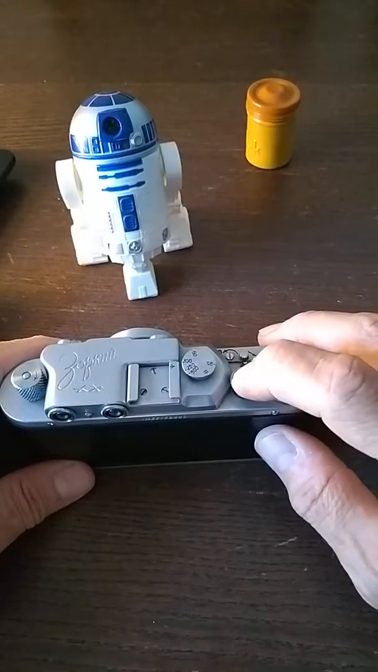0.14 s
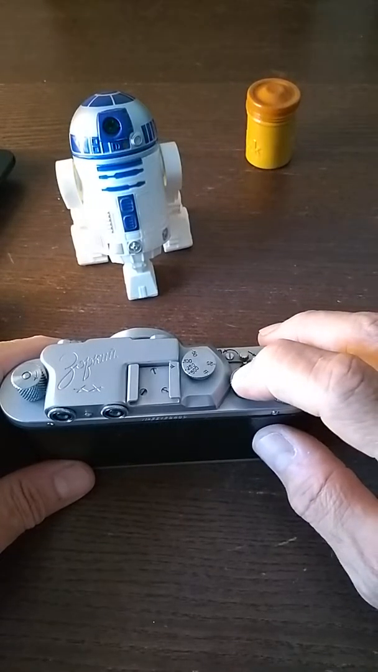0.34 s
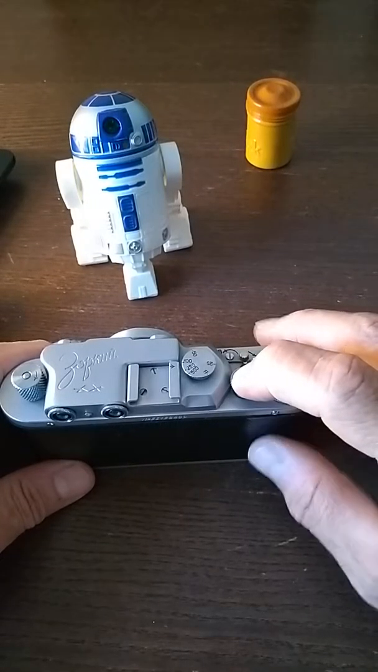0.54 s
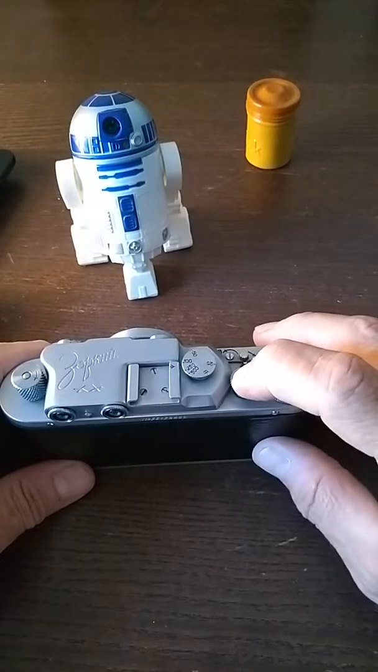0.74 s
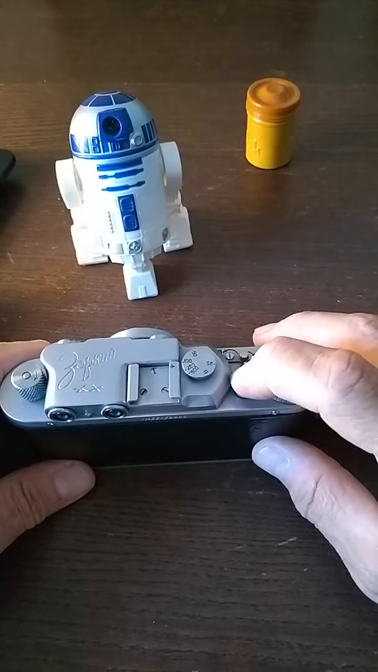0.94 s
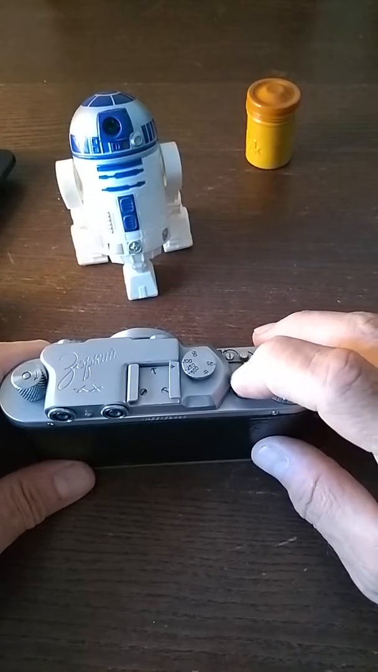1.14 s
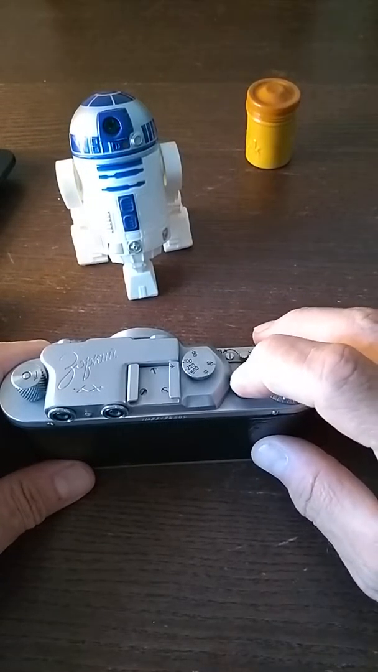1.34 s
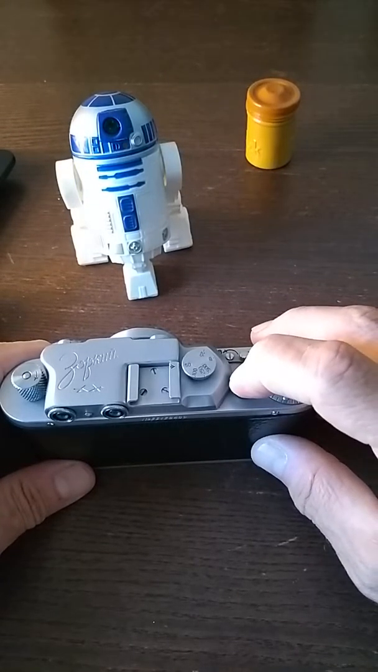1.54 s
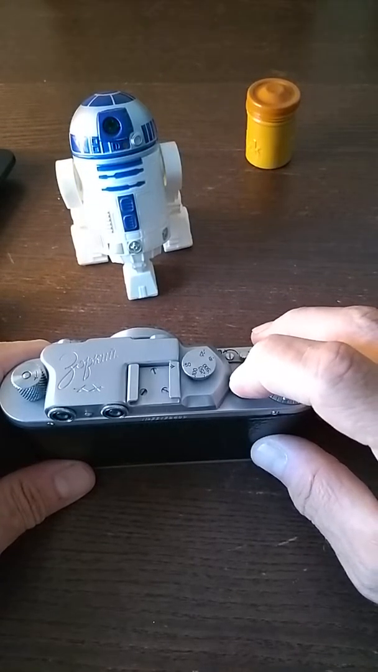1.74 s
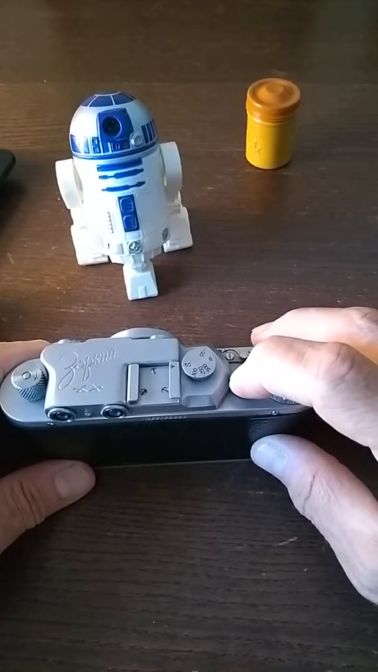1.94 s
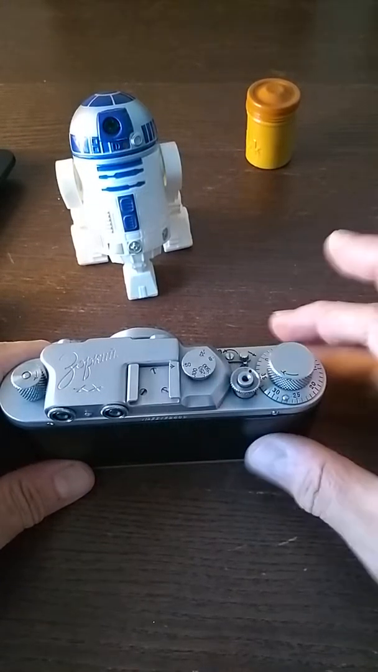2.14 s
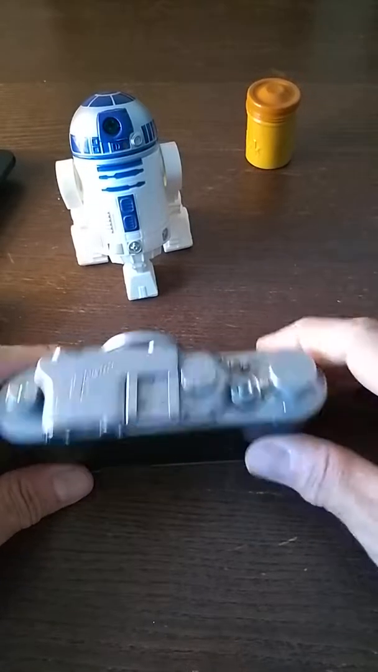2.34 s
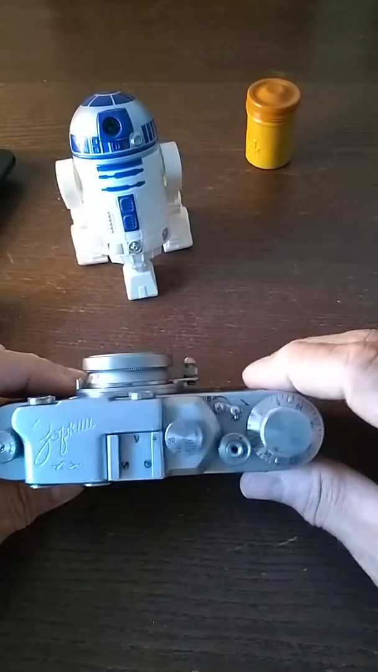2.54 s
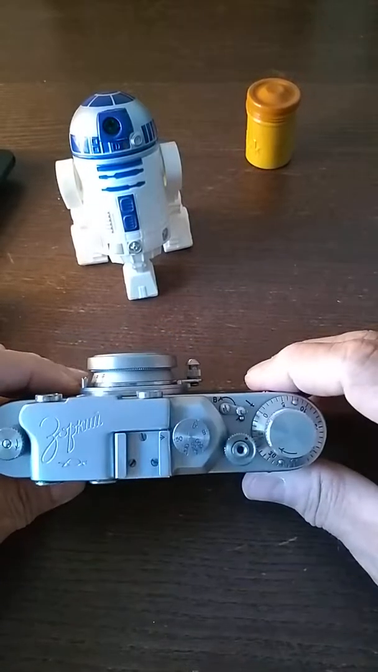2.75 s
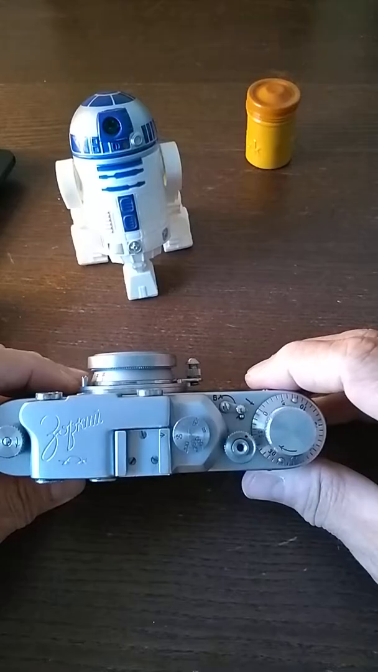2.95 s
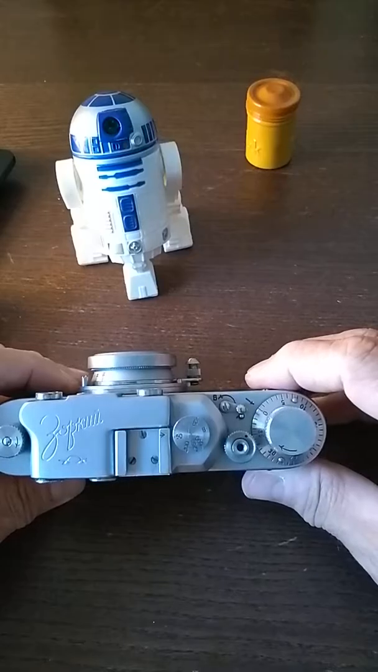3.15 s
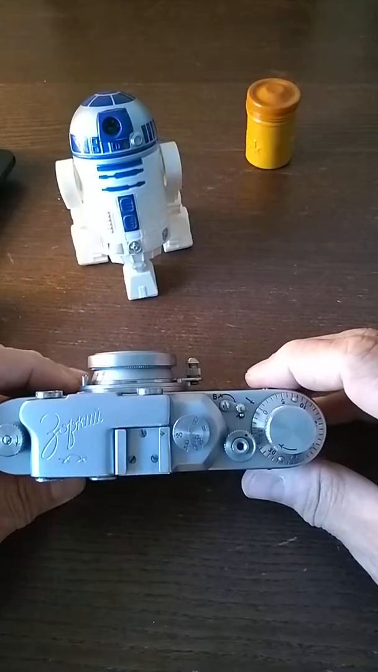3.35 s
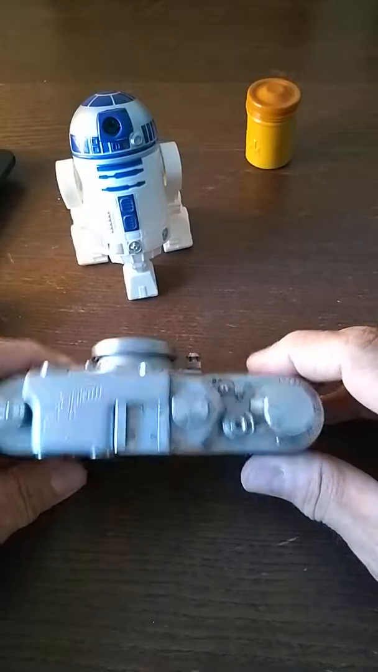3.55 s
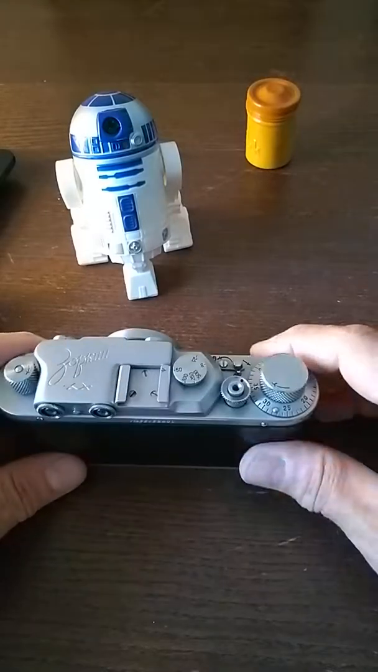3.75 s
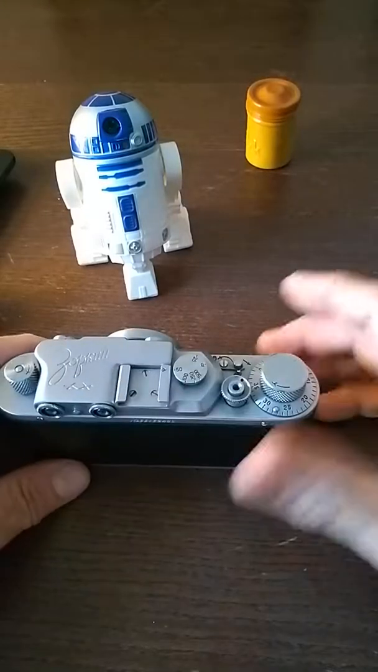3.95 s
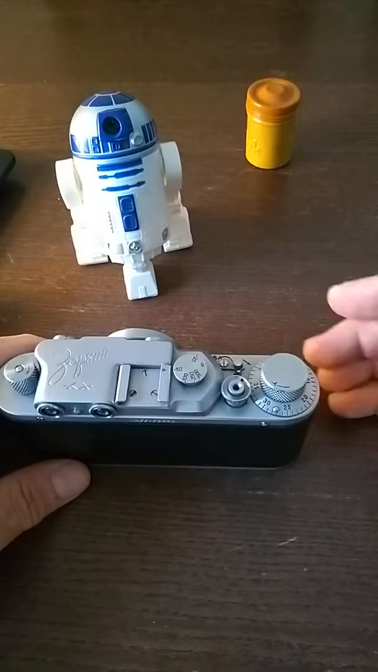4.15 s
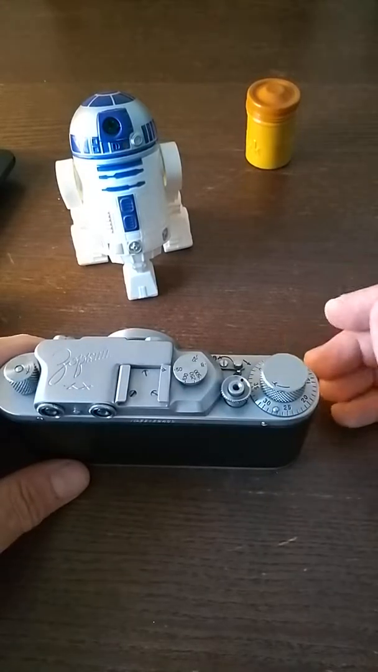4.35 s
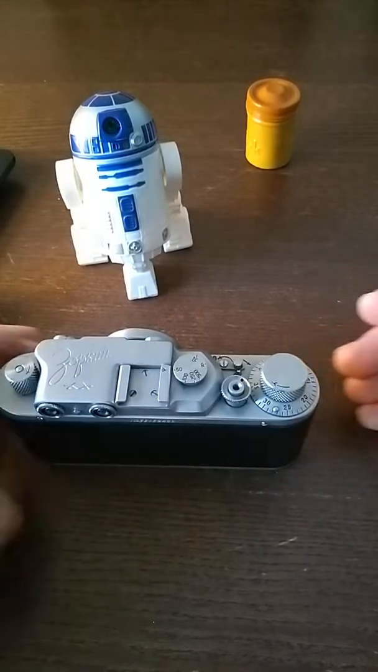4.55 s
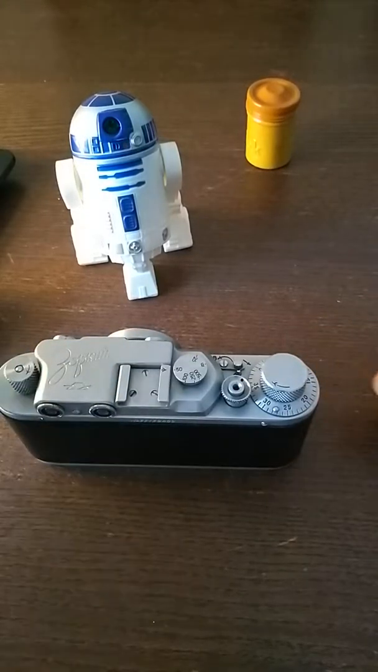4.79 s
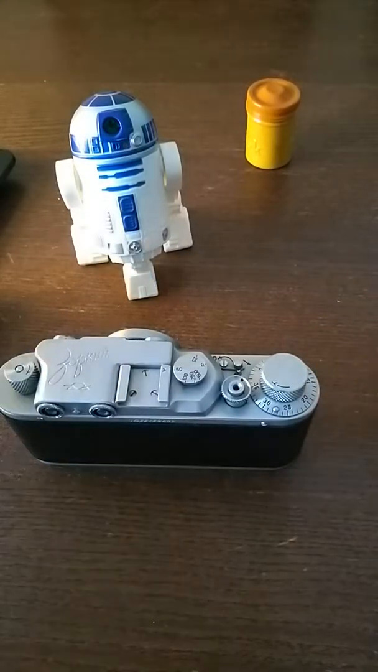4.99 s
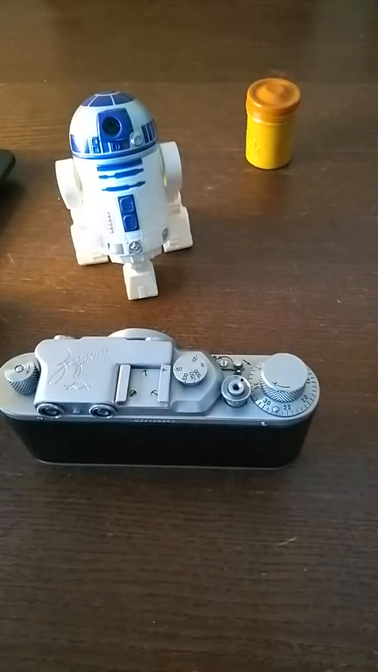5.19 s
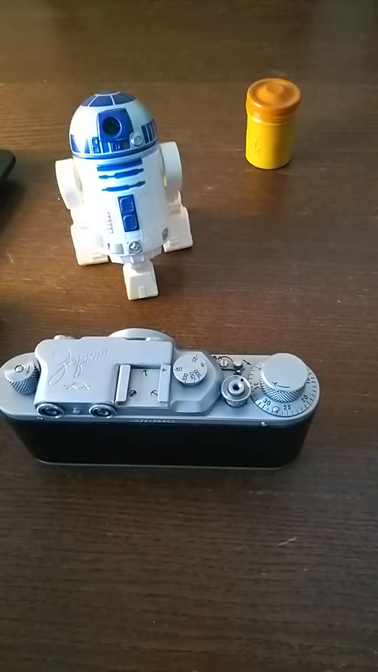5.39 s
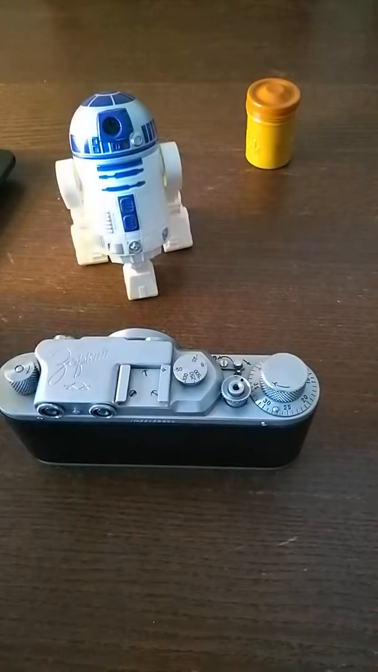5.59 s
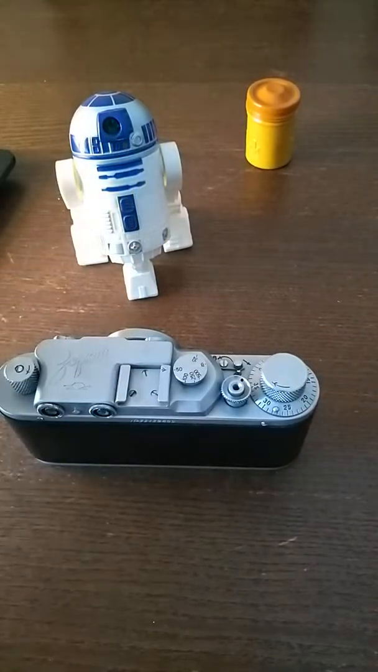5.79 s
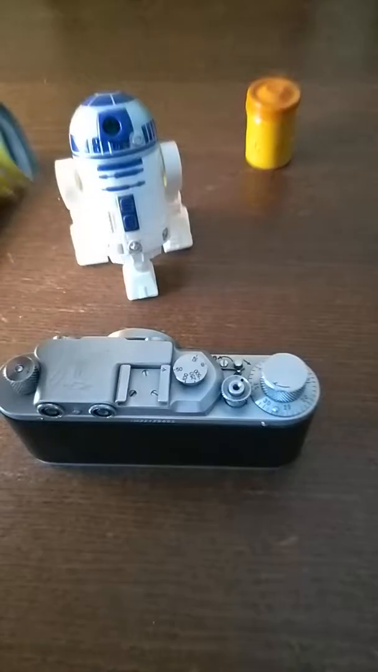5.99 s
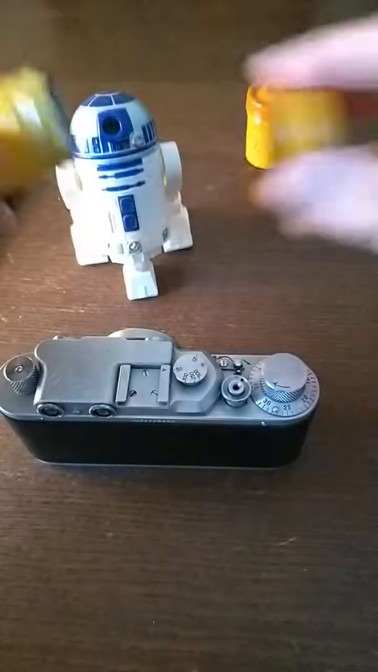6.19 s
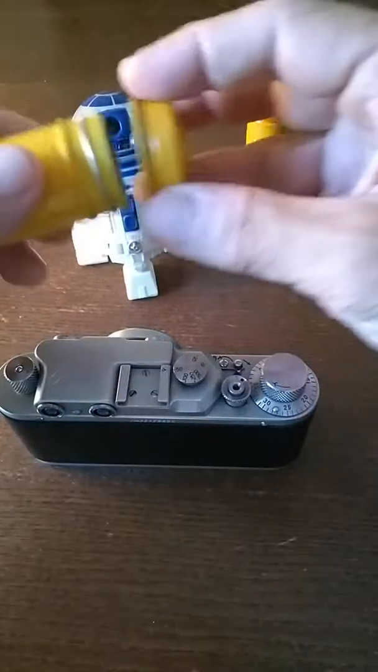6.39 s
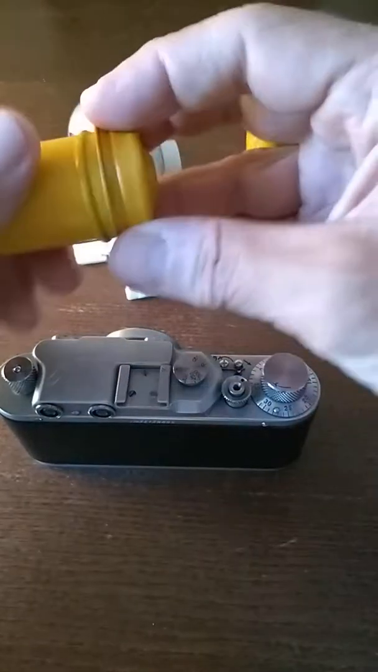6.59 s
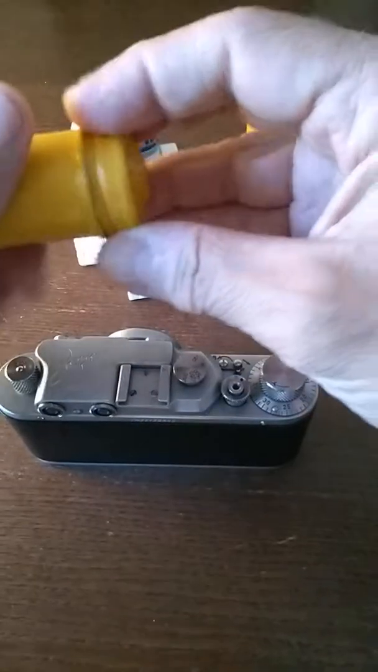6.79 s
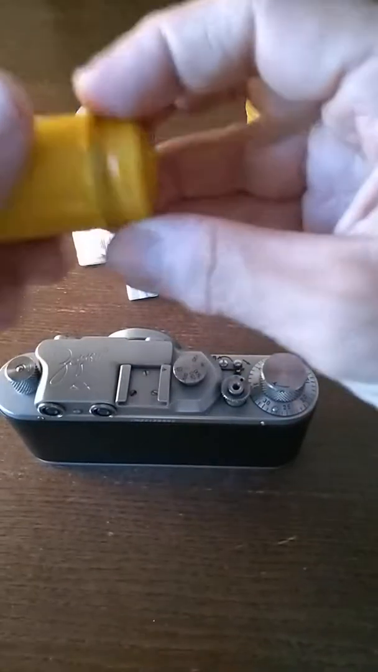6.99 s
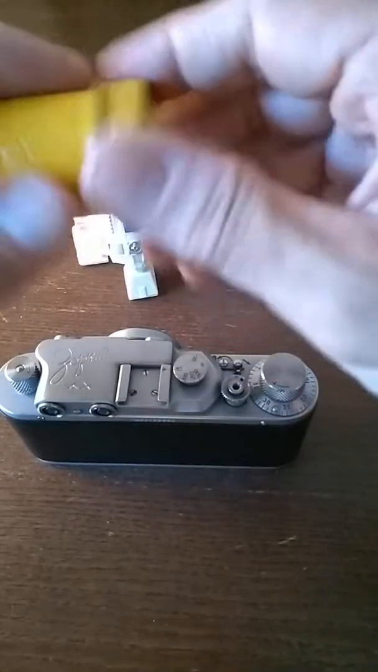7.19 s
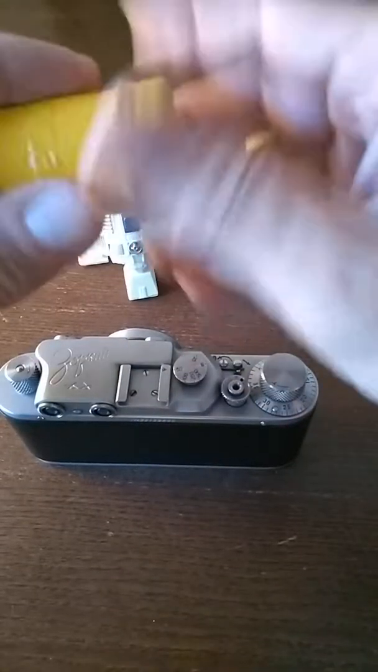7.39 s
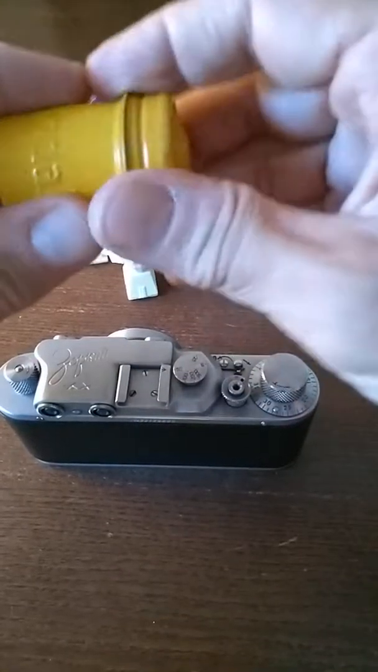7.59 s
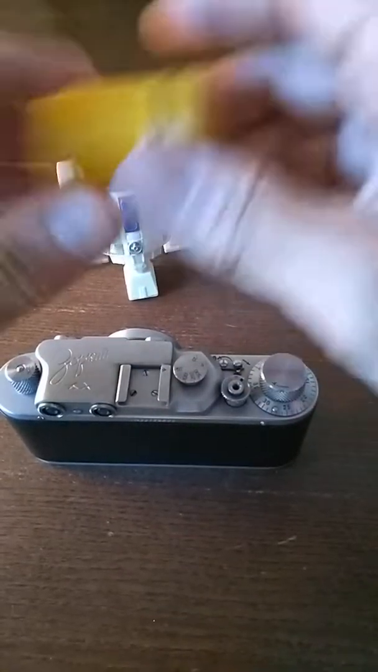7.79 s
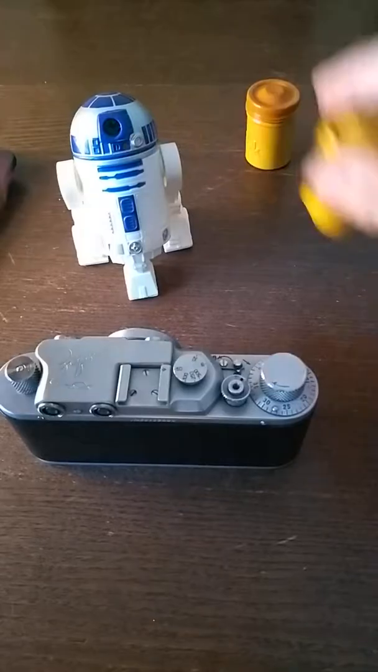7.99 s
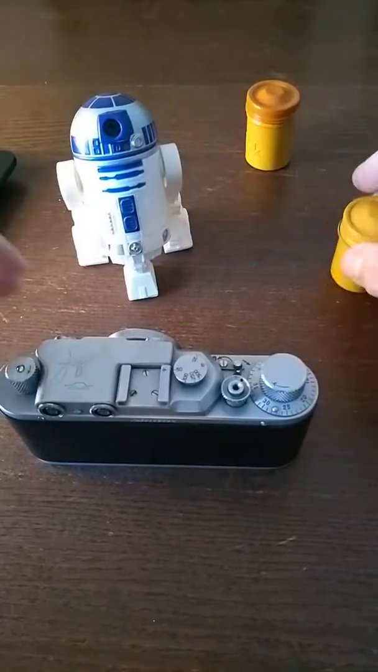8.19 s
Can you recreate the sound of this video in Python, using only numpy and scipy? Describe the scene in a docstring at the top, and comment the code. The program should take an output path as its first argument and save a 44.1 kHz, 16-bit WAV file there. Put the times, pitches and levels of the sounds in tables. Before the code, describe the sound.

A crisp shutter clack from an old metal camera comes first, heard up close over a faint room rumble. Fingers tick against the body, which slides and bumps gently on a wooden table. After a short pause, hands gather a little metal can, knock its lid on and twist it closed in tiny gritty scrapes with light, high tinkles. Finally the can is put down with a hard, rattling tap.

```python
"""Film camera and small can

A metal camera on a wooden table fires its shutter, a finger leaves the release, and the body is tipped
up and set back. Then a small metal can is picked up, its lid is knocked on and screwed shut, and it is
set down. Each touch is a tiny rattle that rings the metal; the heavier bumps also ring the table.
A phone in the quiet room mixes its two microphone openings, which cancels some pitches."""
import sys
import numpy as np
from scipy import signal
from scipy.fft import rfft, irfft, next_fast_len
from scipy.io import wavfile
from scipy.ndimage import map_coordinates

SR = 44100
rng = np.random.default_rng(int(sys.argv[2]) if len(sys.argv) > 2 else 0)


def materialize(psi):
    """Save the field psi as 16-bit PCM at rate SR to the path in sys.argv[1].

    A 1-D psi becomes a single channel; in a 2-D psi each row is a channel.
    """
    bounded = np.clip(np.atleast_2d(psi).T, -1, 1)
    quanta = np.round(bounded * 32767).astype(np.int16)
    wavfile.write(sys.argv[1], SR, quanta)


N = 362943
CONTACT_TIME_S = np.arange(2 ** 13) / SR  # the clock within one touch

# A touch has a sharp crack, a high sparkle and a pitched knock. Sparkle and knock levels count from
# the crack's level. A decay is the time taken to fade by 60 dB.
# Shutter parts catch and stop: start_s, crack_db, sparkle_db, knock_hz, knock_db, decay_s
SHUTTER_CLICKS = [(1.473, -43, -27, 700, -4, 0.056), (1.4935, -15.5, -9, 820, -5, 0.072),
                  (1.503, -28, -16, 480, 9, 0.024), (1.5105, -10.5, -28, 488, -8.5, .035),
                  (1.521, -16, -11, 498, -1.5, .06), (1.532, -18.5, -20, 960, -4.5, 0.063),
                  (1.5399, -7.5, -24, 930, -12, 0.046), (1.553, -9.5, -25, 930, -15, 0.019)]
# Fingers and table touch the camera: start_s, crack_db, sparkle_db, knock_hz, knock_db, decay_s
CAMERA_TOUCHES = [(1.8926, -21, -8.5, 1110, -10.5, 0.043), (1.9107, -27, -8.5, 584, -7, 0.1),
                  (2.0092, -15, -28, 1900, -6.5, 0.04), (2.0279, -17, -14, 1130, -4, .022),
                  (2.0339, -31.5, -8, 1820, 7.5, 0.081), (2.356, -36, -18, 478, -10, .02),
                  (2.367, -39, -20, 603, -6, .02), (2.376, -33, -18, 748, -6, .02),
                  (2.388, -23, -30, 386, -25, 0.028), (2.3964, -29, -20, 590, -1, .03),
                  (2.6468, -38, -29, 1630, 16, 0.015), (3.599, -43, -30, 1950, 3.5, 0.31),
                  (3.69, -24.5, -38, 635, 13.5, 0.0074), (3.7059, -52, -21, 390, 25, 0.04),
                  (3.9816, -28.5, -16, 523, -8, .07), (4.0658, -33, -17, 401, -6, 0.037),
                  (4.077, -41, -15, 417, 3, 0.027), (4.1385, -31.5, -34, 610, -6, 0.018),
                  (4.4748, -49, -3, 493, -10, .03), (4.559, -33.5, -13, 526, -10, 0.03),
                  (4.7313, -45, 2, 420, 1, 0.038)]
# A hand gathers can and lid: start_s, crack_db, sparkle_db, knock_hz, knock_db
CAN_GRABS = [(5.3673, -20, -5, 1430, 3), (5.8094, -43, -14, 640, 7), (5.8672, -48.5, -10, 1490, 12.5),
             (5.976, -26, -2.5, 1630, -1), (6.0377, -43.5, 10, 740, 8), (6.046, -39.5, -18, 840, 20.5),
             (6.0671, -31.5, -12, 1060, 1)]
# The lid is knocked on and fingered: start_s, crack_db, sparkle_db, knock_hz, knock_db
LID_KNOCKS = [(6.4506, -8.5, -9.5, 1436, -2), (6.4656, -13, -16, 1270, -7), (6.5124, -30.5, -8, 1290, 12.5),
              (6.5706, -12.5, -10.5, 633, -8), (6.626, -42, -10, 548, 17), (6.6395, -40, -6, 1240, 10),
              (6.681, -46, -13, 553, 14.5), (6.7075, -39, -12, 540, 11), (6.7393, -32, -10, 1710, 3),
              (6.742, -42, -14, 638, 18.5), (6.7748, -34.5, -29, 516, 2), (6.8149, -44, -13, 1250, 10.5),
              (6.9213, -45.5, -10, 470, 11.5), (6.9592, -47, -15, 470, 12), (7.0457, -36, -9, 452, 6.5),
              (7.071, -33.5, -13, 1050, -18), (7.232, -40, -10, 1400, -4)]
# The thread scrapes as the lid turns: start_s, crack_db, sparkle_db, knock_hz, knock_db, length_s
THREAD_SCRAPES = [(6.557, -35.5, 2, 660, 11.5, 0.024), (6.622, -36.5, -3, 1225, 2, 0.026),
                  (6.812, -37, 0, 1500, -3, 0.085), (6.964, -36, -2.5, 1270, 0.5, 0.04),
                  (7.085, -37, 4, 1470, 1, 0.044), (7.134, -37.5, 7, 2260, 15, 0.041),
                  (7.192, -37, 3, 1480, -16, 0.049)]
# The loose lid tinkles: start_s, crack_db, pitch_hz
LID_TINKLES = [(5.4564, -39.5, 7850), (6.0994, -39, 9700), (6.2741, -44, 8000), (7.33, -39, 8100),
               (7.3373, -40, 9670), (7.4839, -30, 9570), (7.505, -41, 8050), (7.605, -37.5, 7960),
               (7.626, -51, 8300), (7.7877, -45, 8800), (7.84, -49, 5960), (8.109, -39, 8070)]
# The closed can lands and bounces: start_s, crack_db, knock_hz, knock_db
CAN_BOUNCES = [(8.1494, -3, 453, -5.5), (8.1534, -11, 830, -1), (8.1604, -19, 654, 9.5),
               (8.1655, -24, 1014, 14), (8.177, -32.5, 1770, 12)]
# How hard each bump drives the table's notes: start_s, shove_db, low_board_db, high_board_db, top_db
TABLE_BUMPS = [(1.501, -65, -50, -44.5, -43), (2.014, -49, -49, -53, -32), (2.44, -68, -66, -41, -38),
               (2.645, -46, -42, -33, -31.5), (3.691, -55, -46, -32, -27.5),
               (5.969, -43, -28.5, -35.5, -41), (6.045, -38, -31.5, -35, -29), (8.149, -66, -62, -56, -47)]
# Sliding strokes: start_s, swell_s, hold_s, fade_s, groan_db, groan_cutoff_hz, skin_hiss_db
SLIDES = [(2.323, 0.063, 0.0045, 0.048, -52, 400, -46), (2.396, 0.064, 0.012, 0.16, -26, 340, -51),
          (3.493, 0.115, 0.06, 0.009, -38.5, 800, -52), (5.373, 0.0041, 0.0064, 0.16, -48, 900, -43.5),
          (5.8, .01, 0.13, .01, -45, 900, -60)]

# The notes each object rings with when hit: pitch_hz, decay_s, relative_db
CAMERA_NOTES = [(485, 0.034, -13), (1740, 0.055, 0), (2600, 0.03, -2), (3260, 0.037, -6), (3620, 0.015, 8),
                (3600, 0.015, -7), (5010, 0.012, 5), (5600, 0.019, 12.5), (6200, 0.0078, -13),
                (7400, 0.011, -26), (8200, 0.011, 8), (10700, 0.0092, -15), (14000, .02, -27)]
OPEN_CAN_NOTES = [(2580, 0.01, -31), (3430, 0.0084, -6.5), (5860, .025, -1), (5940, 0.018, -7),
                  (7180, 0.0087, 13), (7690, 0.042, 4), (7950, 0.022, 5.5), (10230, 0.032, -8),
                  (10900, .02, -21)]
LID_NOTES = [(5227, .06, -6), (5670, 0.052, -11), (8150, 0.062, -1), (9870, .06, -6), (10740, 0.058, -7),
             (11700, .05, -3), (12900, 0.054, -13)]
CLOSED_CAN_NOTES = [(1280, 0.025, -2), (1770, .04, -6), (2650, 0.023, -4), (3310, 0.034, 4.5),
                    (5290, 0.015, 12.5), (6440, 0.034, 5)]
TABLE_BOARD_NOTES = [(50, 0.26, 0), (96.15, 0.63, 0), (122.8, 1.0, 0.0041)]
TABLE_TOP_NOTES = [(204, 0.5, -1), (267.8, 0.09, 4), (403, 0.16, -3), (542.5, 0.23, -2), (690.5, 0.15, 0.5),
                   (891, 0.08, -1), (890, 0.17, -18.5), (1053, 0.076, 0.5)]

# How long the room echoes: pitch_hz, decay_s
ECHO_DECAY = [(100, 1), (500, 0.46), (2000, 0.53), (6000, 0.48), (14000, 0.3)]
# The tone of the room's rumble and of the hiss of skin and rustle: pitch_hz, relative_db
RUMBLE_TONE = [(20, -16.5), (90, -15), (170, -6), (230, 0.5), (370, 3.5), (600, -4), (1200, -15.5),
               (2000, -28), (3500, -46), (6000, -37)]
HISS_TONE = [(1200, 9.5), (2500, 5), (5000, 3), (8000, -2.5), (11000, -9), (13200, -66), (14200, 0.5)]
# The faint rustle rises and falls: time_s, level_db
RUSTLE_LEVELS = [(0.0, -58), (1.4, -56.5), (3.4, -56.5), (4.3, -55.5), (4.65, -52.5), (5.45, -53.5),
                 (6.67, -49), (6.83, -55.5), (7.15, -49), (7.31, -56), (8.23, -54.5)]

# How far the second microphone opening lags: pitch_hz, left_cycles, right_cycles
OPENING_LAG = [(0, 0, 0), (2240, 1, 1), (3400, 1.5, 1.52), (4478, 1.87, 2), (6632, 2.7, 3), (8785, 3.52, 4),
               (11000, 4.3, 5), (15400, 5.8, 7)]
# How much of that late sound is mixed in: pitch_hz, share
LATE_SHARE = [(500, 0.053), (2200, 0.74), (4500, 0.66), (9000, 0.48), (14000, 0)]
# How far the left channel runs ahead in the bass: pitch_hz, lead_radians
LEFT_LEAD = [(40, 1), (100, 0.86), (200, 0.39), (400, 0.22), (600, 0.15), (900, 0)]
# How much louder left is than right: pitch_hz, difference_db
LEFT_BALANCE = [(25, 5), (60, -4.5), (130, -0.5), (250, 0.8), (600, 0.63), (1200, -0.37)]


def camera():
    """Shutter parts catch and stop, then fingers and table knock against the metal body."""
    clicks = [(*row, blow(decay_s, rise_s=0.0014)) for *row, decay_s in SHUTTER_CLICKS]
    touches = [(*row, blow(decay_s, rise_s=0.00067)) for *row, decay_s in CAMERA_TOUCHES]
    shutter = strike(clicks, CAMERA_NOTES, knock_cycles=16, ring_db=-45, dullness=0.042,
                     low_hz=3020, high_hz=8000, grit_db=-1.5)
    handling = strike(touches, CAMERA_NOTES, knock_cycles=16, ring_db=-48, dullness=1.22,
                      low_hz=2700, high_hz=6460, grit_db=3.0)
    return shutter + handling


def lid_knocks():
    """The lid is knocked onto the can; harder knocks bring out more of its ring."""
    hits = [(*row, blow(decay_s=0.011, rise_s=0.00017)) for row in LID_KNOCKS]
    return strike(hits, OPEN_CAN_NOTES, knock_cycles=20, ring_db=-18, dullness=1,
                  low_hz=2120, high_hz=7140, grit_db=7.0, ring_growth=0.58)


def can_pickup():
    """Can and lid give dry clicks as a hand gathers them from the table."""
    hits = [(*row, blow(decay_s=0.025, rise_s=0.00017)) for row in CAN_GRABS]
    return strike(hits, OPEN_CAN_NOTES, knock_cycles=2.8, ring_db=-43, dullness=0.55,
                  low_hz=2170, high_hz=7160, grit_db=2.5)


def lid_screwing():
    """Each twist scrapes the thread and sounds the hollow of the can."""
    hits = [(*row, twist(length_s)) for *row, length_s in THREAD_SCRAPES]
    return strike(hits, OPEN_CAN_NOTES, knock_cycles=13, ring_db=-43, dullness=1,
                  low_hz=1800, high_hz=6700, grit_db=3.5)


def lid_tinkles(sparkle_db=-15, note_db=-7):
    """Light taps ring the loose lid, each with one high note standing out."""
    force = blow(decay_s=0.012, rise_s=0.00064)
    hits = [(start_s, db, sparkle_db, hz, note_db, force) for start_s, db, hz in LID_TINKLES]
    return strike(hits, LID_NOTES, knock_cycles=210, ring_db=-30, dullness=0,
                  low_hz=6000, high_hz=10400, grit_db=2.5)


def can_landing(sparkle_db=-30, stretch=1.8):
    """The closed can hits the table; each bounce rattles longer than the one before."""
    hits = [(start_s, db, sparkle_db, hz, knock_db, blow(decay_s=0.011 * stretch ** k, rise_s=0.00029))
            for k, (start_s, db, hz, knock_db) in enumerate(CAN_BOUNCES)]
    return strike(hits, CLOSED_CAN_NOTES, knock_cycles=14, ring_db=-38, dullness=0.99,
                  low_hz=1600, high_hz=7040, grit_db=5.5)


def strike(hits, notes, knock_cycles, ring_db, dullness, low_hz, high_hz, grit_db, ring_growth=0):
    """A rattling force makes a crack (low_hz to high_hz), a sparkle above it and a pitched knock."""
    out, size = np.zeros(N + SR), len(CONTACT_TIME_S)
    f = np.fft.rfftfreq(size, 1 / SR)
    treble = (1j * f / high_hz / (1 + 1j * f / high_hz)) ** 4 / (1 + 1j * f / 9500) ** 4
    middle = (1 - 1 / (1 + 1j * f / low_hz)) ** 3 / (1 + 1j * f / high_hz) ** 4
    for start_s, crack_db, sparkle_db, knock_hz, knock_db, force in hits:
        lumps = amp(grit_db * np.repeat(rng.standard_normal(size // 64), 64))  # the force is uneven
        rattle = rfft(force * lumps * rng.standard_normal(size))
        varied_notes = [(hz, decay_s, db + 2 * rng.normal()) for hz, decay_s, db in notes]
        metal = 1 + amp(ring_db + ring_growth * crack_db) * ringing(varied_notes, f)
        crack = metal * middle / (1 + 1j * f / low_hz) ** (2 * dullness)  # soft touches lose their edge
        knock = ringing([(knock_hz, knock_cycles / knock_hz, 0)], f)
        knock *= soften(f, 2 * knock_hz) * f / (f - 250j)  # trim treble and bass
        parts = irfft(rattle * np.array([crack, metal * treble, knock]), size)
        gains = amp(crack_db + np.array([0, sparkle_db, knock_db])) / np.abs(parts).max(axis=1)
        out[round(start_s * SR):][:size] += gains @ parts
    return out[:N]


def blow(decay_s, rise_s):
    """The force of a blow rises quickly, then dies away."""
    return amp(-60 * CONTACT_TIME_S / decay_s) * (1 - np.exp(-(CONTACT_TIME_S / rise_s) ** 2))


def twist(length_s):
    """The force of a twist swells and lets go."""
    return np.sin(np.pi * np.clip(CONTACT_TIME_S / length_s, 0, 1)) ** 2


def table_thumps():
    """Soft bumps shove the table and ring the deep notes of its board and the quicker ones of its top."""
    bumps = np.zeros((4, N))
    for start_s, *levels_db in TABLE_BUMPS:
        bumps[:, round(start_s * SR)] = amp(levels_db)

    def wood(f):
        board = [soften(f, 172) * ringing([note], f) for note in TABLE_BOARD_NOTES]
        top = amp(-9.5) * soften(f, 2700) * ringing(TABLE_TOP_NOTES, f) * f / (f - 150j)
        return np.array([*board, top])
    return filtered(bumps, wood).sum(axis=0)


def rubbing():
    """Sliding is grainy: it makes the table top groan and skin hiss on the metal."""
    wood_grain, skin_grain = rng.standard_normal((2, N)) * amp(2.8 * np.array([wobble(60), wobble(300)]))
    metal = lambda f: amp(at_pitch(HISS_TONE, f)) * (1 + amp(-52) * ringing(CAMERA_NOTES, f))
    hiss = unit(filtered(skin_grain, metal))
    out = np.zeros(N)
    for *timing, groan_db, cutoff_hz, hiss_db in SLIDES:
        wood = lambda f: ringing(TABLE_TOP_NOTES[1:], f) / (1 + 1j * f / cutoff_hz) ** 3
        groan = unit(filtered(wood_grain, wood))
        out += stroke(*timing) * (amp(groan_db) * groan + amp(hiss_db) * hiss)
    return out


def stroke(start_s, swell_s, hold_s, fade_s, edge_db=-23):
    """The loudness of one slide: it swells, holds and fades, with silence on both sides."""
    corners_s = start_s + np.cumsum([0, swell_s, hold_s, fade_s])
    return amp(np.interp(np.arange(N) / SR, corners_s, [edge_db, 0, 0, edge_db], -120, -120))


def room_echo(sound):
    """Each third of a second gets its own echo; in the treble the left and right walls differ."""
    out, step = np.zeros(N + 2 * SR), SR // 3
    for start in range(0, N, step):
        echo = signal.fftconvolve(sound[start:start + step], echo_tail())
        out[start + 200:][:len(echo)] += echo
    side_echo = signal.fftconvolve(sound, echo_tail())[:N]
    side_treble = filtered(side_echo, lambda f: (1j * f / 4000 / (1 + 1j * f / 4000)) ** 4)
    return out[:N] + amp(-12.5) * np.outer([1, -1], side_treble)


def echo_tail():
    """The room's answer to one click: noise in which each pitch dies at its own speed."""
    hz, time_s, spectrum = signal.stft(rng.standard_normal(SR // 2), SR, nperseg=256)
    fade = amp(-60 * time_s / at_pitch(ECHO_DECAY, hz)[:, None])
    tail = signal.istft(spectrum * fade, SR, nperseg=256)[1]
    return tail / np.linalg.norm(tail)


def background():
    """The room rumbles and the table board hums along, with a high rustle and a thin whine."""
    time_s = np.arange(N) / SR
    rumble = amp(-45 + 0.4 * wobble(2.68) + 1.86 * wobble(14)) * noise(RUMBLE_TONE)[0]
    hum = amp(-60) * unit(filtered(rng.standard_normal(N), lambda f: ringing(TABLE_BOARD_NOTES[2:], f)))
    rustle_db = np.interp(time_s, *np.transpose(RUSTLE_LEVELS)) + 1.6 * wobble(7.8)
    rustle = amp(rustle_db) * noise(HISS_TONE)[0]
    whine = amp(-82 + 1.8 * wobble(4.6)) * np.sin(2 * np.pi * 9450 * time_s)
    return rumble + hum + rustle + whine


def ringing(notes, f):
    """A filter that turns a click into these fading notes."""
    return sum((-1) ** k * amp(db) * SR * 1j * f / np.pi
               / (hz * hz - f * f + 1j * f * np.log(1000) / (np.pi * decay_s))
               for k, (hz, decay_s, db) in enumerate(notes))


def soften(f, cutoff_hz):
    """A filter that turns down the pitches above the cutoff."""
    return 1 / (1 + 1j * f / cutoff_hz) ** 2


def filtered(sound, response):
    """Pass a sound through a filter, given as a function of frequency."""
    size = next_fast_len(N + SR)
    return irfft(rfft(sound, size) * response(np.fft.rfftfreq(size, 1 / SR)), size)[..., :N]


def noise(tone, channels=1):
    """Noise shaped by rows of pitch_hz, relative_db."""
    return unit(filtered(rng.standard_normal((channels, N)), lambda hz: amp(at_pitch(tone, hz))))


def wobble(per_second):
    """A smooth curve through this many random values a second."""
    values = rng.standard_normal(int(N * per_second / SR) + 4)
    return map_coordinates(values, [np.arange(N) * per_second / SR])


def at_pitch(rows, hz):
    """Look up a pitch in a table, gliding between its rows."""
    pitches, values = np.transpose(rows)
    return np.interp(np.log(hz + 1), np.log(pitches + 1), values)


def amp(db):
    """Turn decibels into a multiplier."""
    return 10 ** (np.asarray(db) / 20)


def unit(sound):
    """Scale a sound to an average (rms) level of 1."""
    return sound / np.sqrt(np.mean(sound ** 2) + 1e-20)


def scene():
    """Camera and can at one spot in front of the phone, with the table and the room around them."""
    near = camera() + lid_knocks() + can_pickup() + lid_screwing() + lid_tinkles() + can_landing()
    near += rubbing()
    return near + table_thumps() + amp(-8) * room_echo(near) + background()


def record(dry):
    """The phone mixes its two openings, adds circuit hiss and cuts the lowest and highest pitches."""
    hz, left_lag, right_lag = np.transpose(OPENING_LAG)

    def microphones(f):
        lag = np.array([np.interp(f, hz, left_lag), np.interp(f, hz, right_lag)])
        # The late sound is subtracted, so pitches that lag by whole cycles are weakened.
        notches = 1 - at_pitch(LATE_SHARE, f) * np.exp(-2j * np.pi * lag)
        lead = np.exp(.5j * np.outer([1, -1], at_pitch(LEFT_LEAD, f)))
        balance = amp(.5 * np.outer([1, -1], at_pitch(LEFT_BALANCE, f)))
        return notches * lead * balance
    hiss = amp(-70) * noise([(20, 20), (150, 3), (500, -5), (3000, -61), (4500, 15), (14000, 9)], 2)
    lowest_hz, highest_hz = 22, 14350
    band = lambda f: (f < highest_hz) * (f / (f - 1j * lowest_hz)) ** 2
    return filtered(filtered(dry, microphones) + hiss, band)


dry = scene()
out = record(dry)
materialize(out)
```